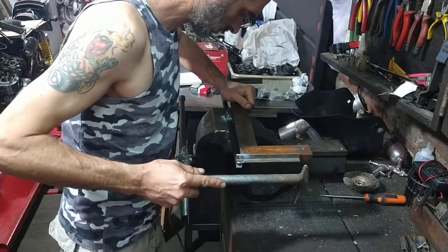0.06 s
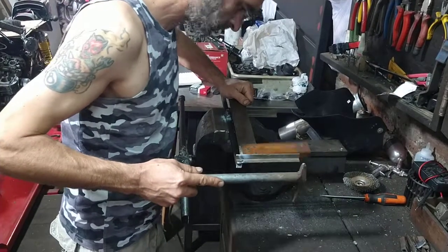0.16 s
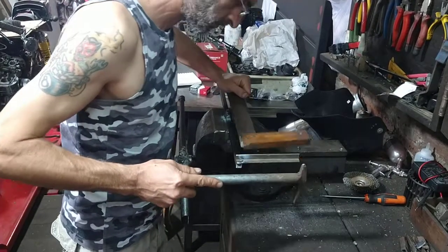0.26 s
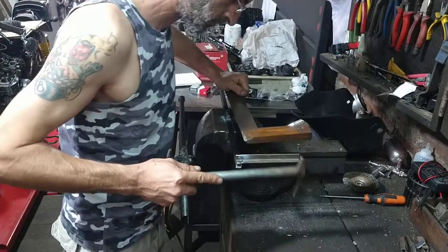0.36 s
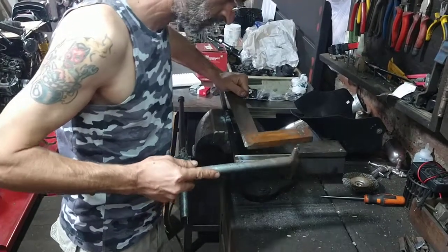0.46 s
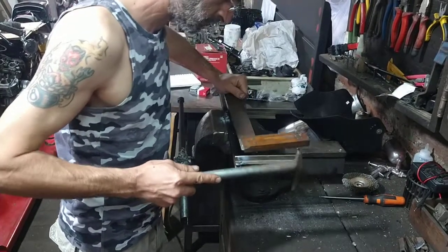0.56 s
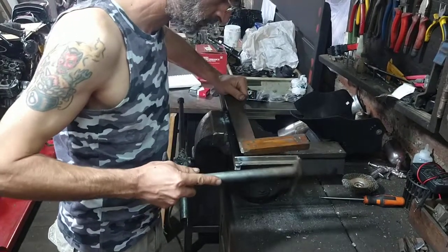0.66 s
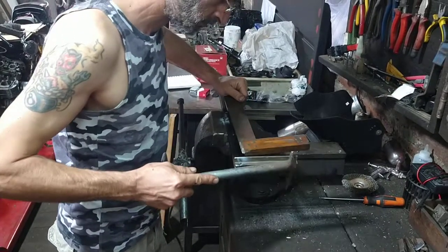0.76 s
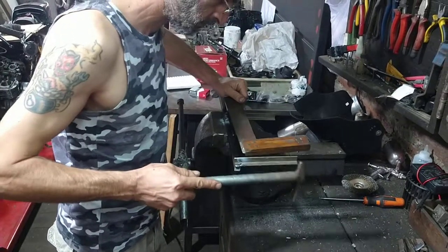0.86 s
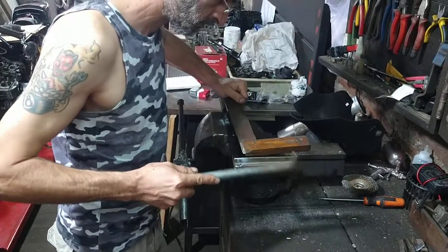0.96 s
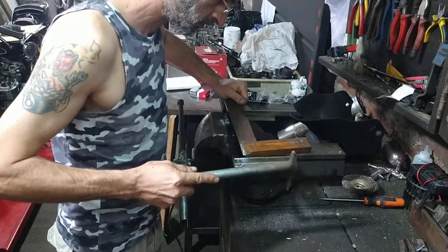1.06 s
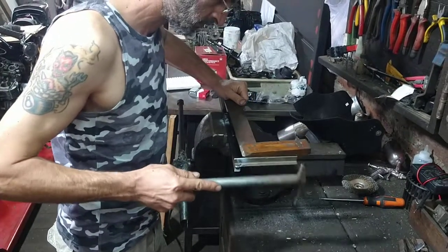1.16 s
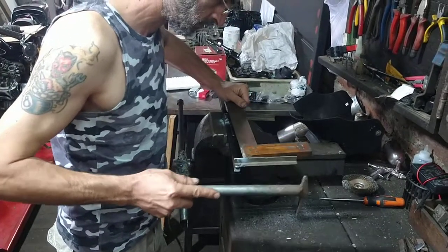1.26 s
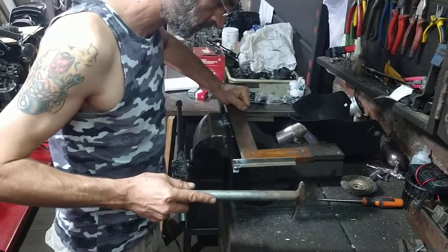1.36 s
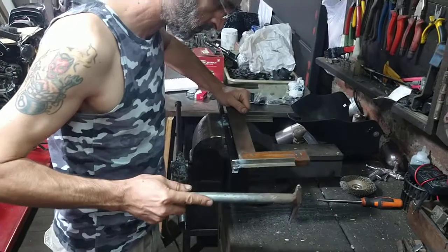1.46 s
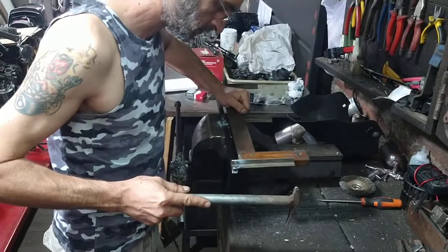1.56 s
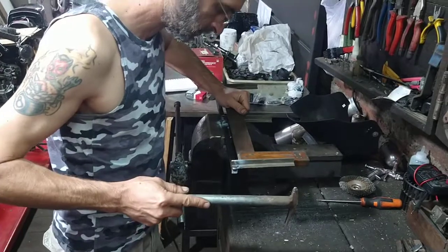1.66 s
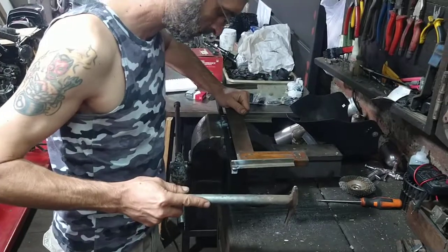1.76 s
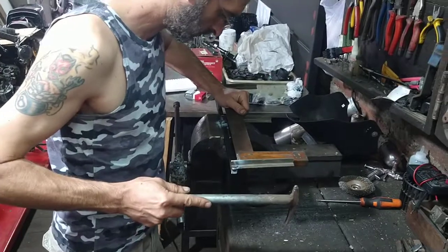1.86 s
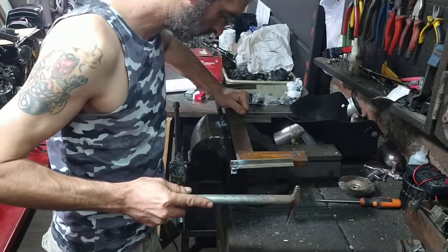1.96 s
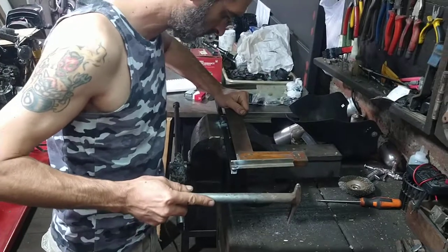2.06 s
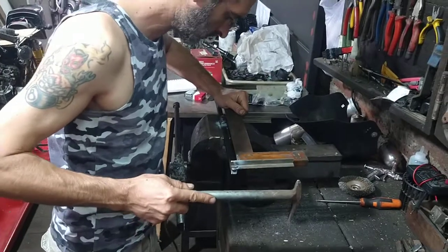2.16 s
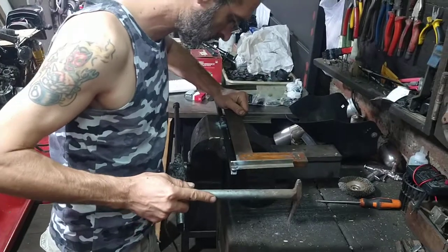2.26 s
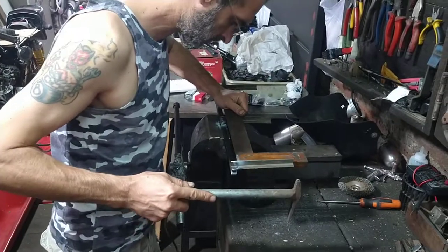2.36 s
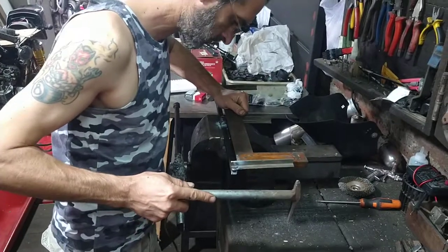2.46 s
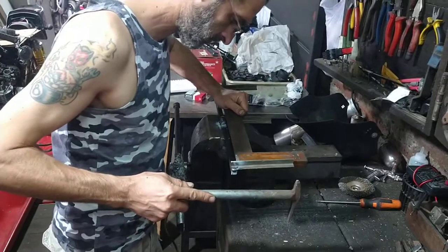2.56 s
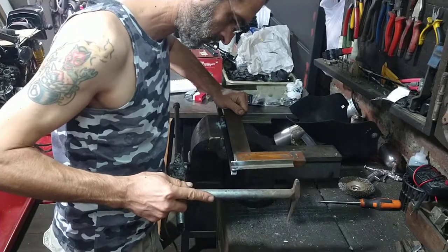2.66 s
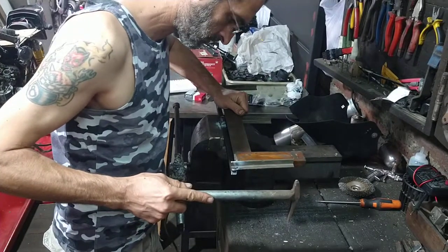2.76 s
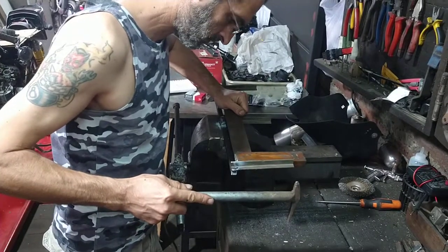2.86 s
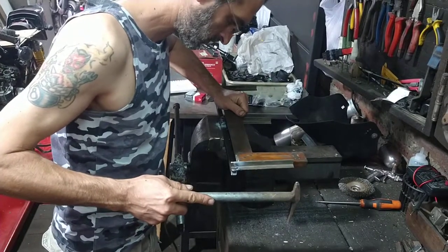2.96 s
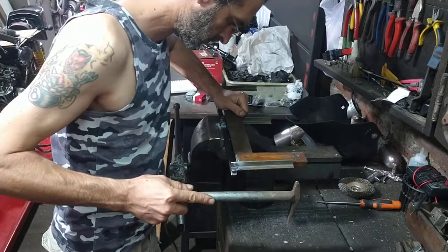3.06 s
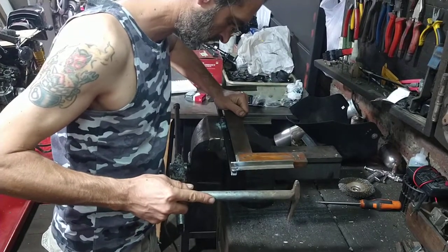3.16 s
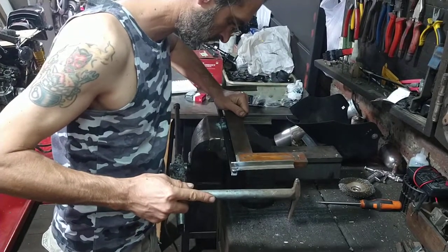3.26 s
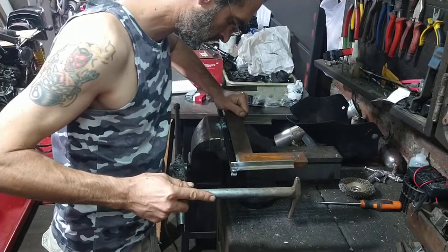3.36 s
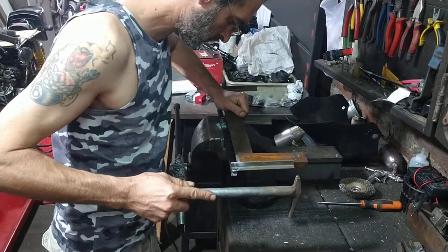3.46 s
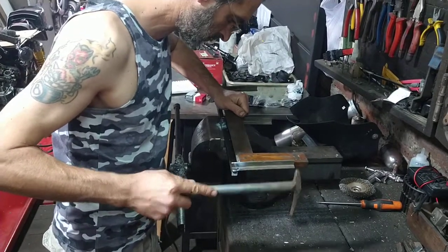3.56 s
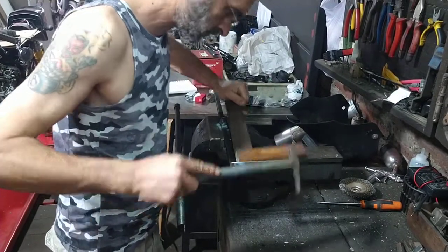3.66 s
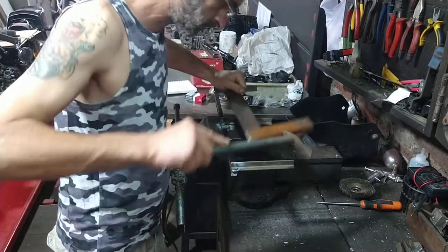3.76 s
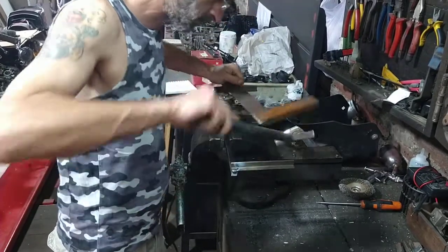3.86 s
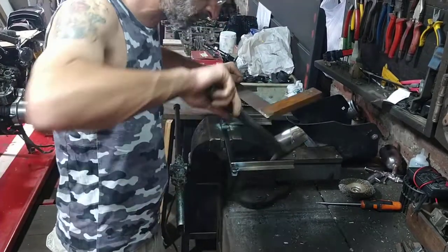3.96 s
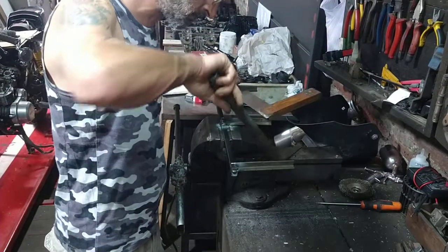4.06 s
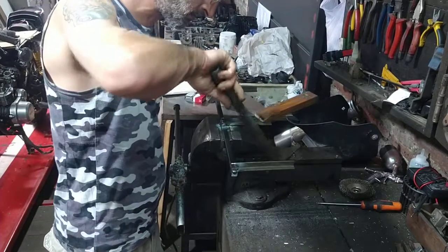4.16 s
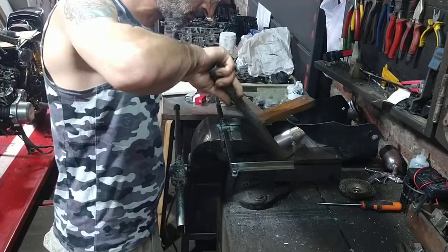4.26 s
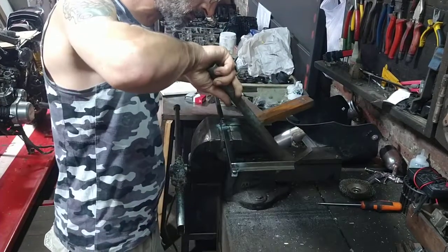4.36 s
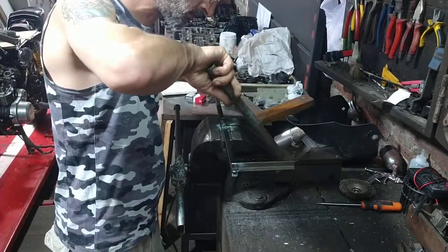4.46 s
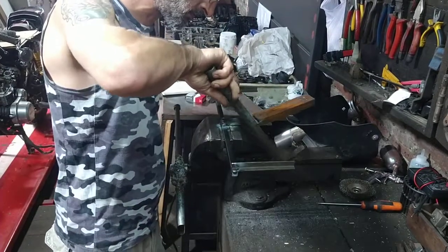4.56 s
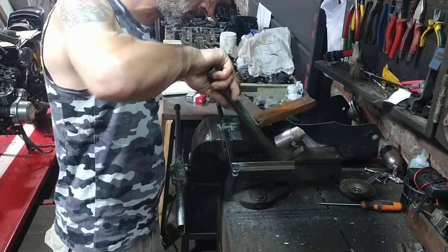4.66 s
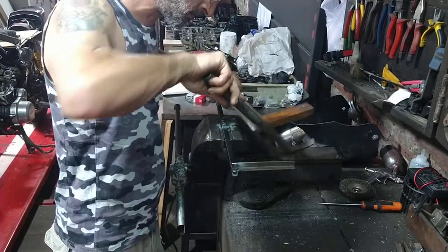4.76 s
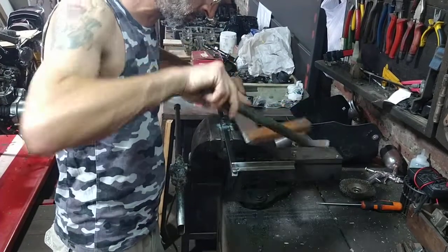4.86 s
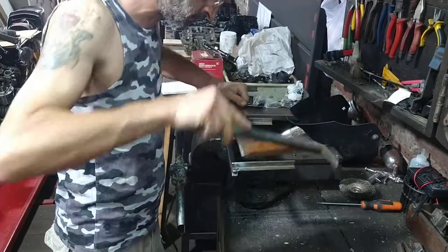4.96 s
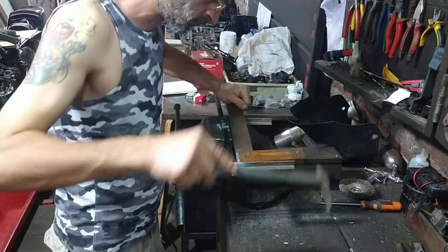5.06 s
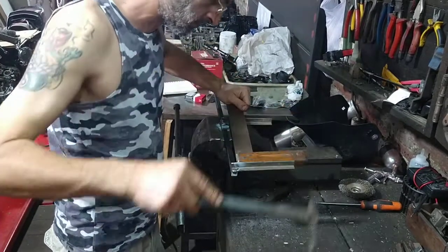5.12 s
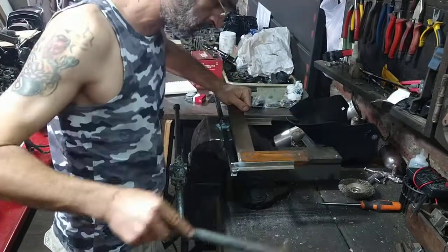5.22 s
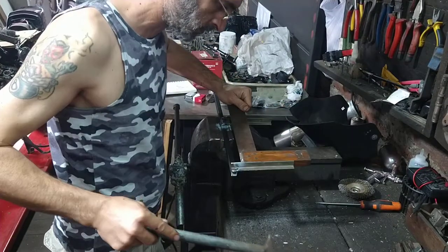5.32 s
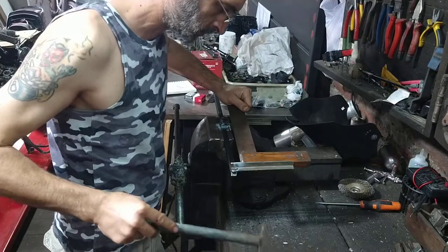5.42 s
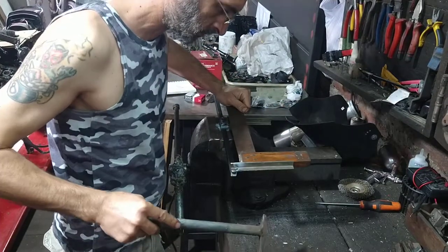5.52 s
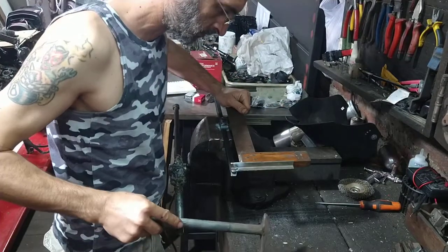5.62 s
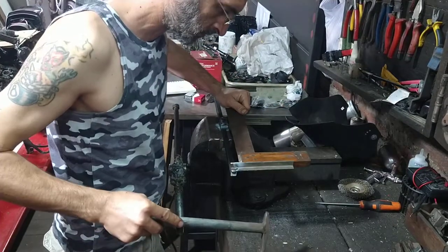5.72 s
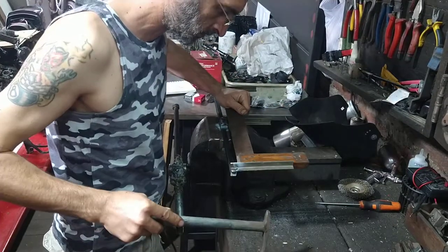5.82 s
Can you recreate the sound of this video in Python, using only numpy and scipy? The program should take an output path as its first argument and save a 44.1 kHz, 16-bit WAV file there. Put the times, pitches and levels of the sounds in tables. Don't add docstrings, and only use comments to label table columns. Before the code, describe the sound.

Close stereo microphones in a cluttered garage. Half a second of low workshop hum, then three loud hammer blows on angle iron in a vise at about 0.54, 0.81 and 1.09 s. Each is two to four contacts within some tens of milliseconds, a harsh bright clank with ringing between roughly 2 and 12 kHz, gone in a few tenths, over a low bench thump; the third is hardest. Faint bench thuds follow to 1.7 s. From 2.1 to 3.1 s it is quiet: slight cloth rustle and soft, evenly spaced rattling ticks. A light, duller tap comes at 3.73 s, a small rustle at 4.1 s, then two sharp clanks at 4.45 and 4.53 s, thinner and higher. More rustle and ticks near 4.85 and 5.15 s. At 5.38 s the iron is set down with a bouncing clunk, bench thuds and a brief noise swell, then quiet hum.

```python
import sys
import numpy as np
from scipy import signal
from scipy.fft import rfft, irfft
from scipy.io import wavfile
from scipy.ndimage import uniform_filter1d

SR = 44100
rng = np.random.default_rng(int(sys.argv[2]) if len(sys.argv) > 2 else 0)


def voltage_ratio(level):
    return 10 ** (np.asarray(level, float) / 20)


def digitize_waveform(pressure):
    field = np.atleast_2d(pressure).T
    bounded = np.clip(field, -1, 1)
    quanta = np.round(bounded * 32767).astype(np.int16)
    wavfile.write(sys.argv[1], SR, quanta)


N = 259749

# frequency in Hz, level in dB per Hz
VISE = [(290, -61), (500, -31), (1700, -12), (2070, -15.5), (2500, -9.5), (2850, -3), (3200, -15),
        (4030, -12), (5300, -3), (7640, -4.5), (9200, -6.5), (12400, -21.5), (13600, -16.5), (16500, -29.5)]
GLANCED = [(290, -60.5), (500, -29), (1700, -12), (2070, -17), (2500, -10), (2830, -4.5), (3200, -15),
           (4030, -13.5), (5300, -8.5), (7640, -10), (9200, -6.5), (12400, -21.5), (13600, -17.5),
           (16500, -26.5)]
SQUARE = [(290, -61), (500, -29), (1700, -13.5), (2070, -19), (2500, -9.5), (2830, -5), (3200, -19),
          (4030, -14), (5300, -4.5), (6100, -3), (7640, -8.5), (9200, -4), (12400, -18), (13600, -14.5),
          (16500, -28.5)]
LIFTED = [(290, -48), (500, -41), (1700, -12.5), (2160, -17), (3220, -12.5), (3580, -19.5), (5200, -7.5),
          (5700, -16.5), (6400, -5), (7340, -11.5), (8380, -10.5), (12000, -15), (13500, -27), (15200, -27),
          (16500, -34.5)]
KICKED = [(290, -52), (500, -30.5), (1700, -20), (2600, -17.5), (3220, -11.5), (3620, -22.5), (4900, -7.5),
          (5700, -14.5), (6200, -10), (6780, -6), (7500, -14.5), (8300, -11), (9000, -18.5), (11500, -16),
          (13500, -27), (16500, -35.5)]
GRAZE = [(240, -54.5), (400, -12.5), (994, -21.5), (1630, -5), (1900, -13.5), (2290, -1.5), (3160, -14),
         (4650, -8), (9610, -12), (13700, -24.5), (16000, -89)]
DROPPED = [(120, -62), (200, -18), (777, -13.5), (1420, -17), (1710, -15), (2130, -12.5), (3490, -11.5),
           (4520, -5), (5420, -6.5), (6300, -11), (7830, -5), (14600, -26), (16000, -58.5)]
# contacts (start in seconds, force in dB), steel modes (frequency in Hz, level in dB,
# time to fall 60 dB in seconds), share of ring left by the grip, clash in dB, clash colour,
# spread of each mode's cluster in Hz
FIRST = ([(0.5352, -15), (0.5414, -18), (0.5654, -21)], [(1755, -19, 0.3), (2298, -14, 0.3),
         (2530, -12.5, 0.17), (2715, -4.5, 0.34), (2820, -7.5, 0.44),
         (2960, -14.5, .36)] + [(5265, -11, 0.14), (5760, -5.5, 0.27), (6120, -10.0, 0.22),
         (6320, -14.5, 1.0), (6700, 0.0, 0.26), (6730, -7.5, 0.42), (7100, -4.5, 0.29), (7200, 0.0, 0.42),
         (7600, -5.5, 0.32), (8100, -4.5, 0.34), (8186, 1, 0.17), (8600, 9, 0.19), (9040, 7.0, 0.24),
         (9520, 2.5, 0.28), (10160, -5.5, 0.26), (11000, -12, 0.21), (11440, -5.0, 0.26), (12050, -7, 0.2),
         (13300, -15, 0.3)], 0.94, 6.4, VISE, 53)
SECOND = ([(.806, -18.5), (.813, -13), (.858, -24)], [(1852.5, -10.5, 0.45), (2420, -7.5, 0.4),
          (2770, -1.5, 0.5), (2870, -6, 0.55)] + [(3176, -14.5, 0.39), (5100, -18.5, 0.69),
          (5230, -5.0, 0.032), (5700, -11.5, 0.47), (5997, -8.5, 0.29), (6840, -15.0, 1.3),
          (7375, -20.5, 1.2), (7720, -28, 0.43), (9071, -11.5, 0.28), (9240, -7.5, 0.36), (9230, 5, 0.39),
          (10040, -13, 0.54), (10430, -27, 0.39), (11400, -25.5, 0.44), (11360, -15.5, 0.14),
          (11600, -18.5, 0.1833), (12820, -35.0, 0.8), (13200, -13.0, 0.21)], 0.99, 7.74, GLANCED, 33.7)
THIRD = ([(1.0869, -9.5), (1.0945, -14), (1.1084, -14), (1.1155, -18)], [(1796, -15, 0.16),
         (2330, -14, 0.22), (2796, -3, 0.67), (2870, -7.5, 0.7)] + [(3683, -24.5, 0.3), (5290, -3, 0.28),
         (5300, 1.5, 0.4), (5800, -1, 0.23), (5660, 2, 0.34), (5960, -1, .27), (5920, -6.5, 0.46),
         (6670, 0.5, 0.3), (7243, -20.5, 0.68), (7736, -10.5, 0.37), (7700, -13.5, 0.35),
         (8400, 6.5, 0.0807), (8860, 4, 0.26), (9300, 6.5, 0.3), (9980, -9.0, 0.25), (10400, -10.5, 0.074),
         (10790, -6.5, 0.3), (11540, -15.0, 0.54), (11500, -5.5, 0.17), (11800, -21.0, 0.2),
         (12820, -33.0, 0.22), (12940, -25.0, 0.21), (13300, -14.0, 0.19), (13770, -23.0, 0.2)],
         0.55, 6.9, SQUARE, 26)
TOUCH = ([(3.7305, -31.5), (3.7374, -34.5), (3.752, -39)], [(1390, 1.5, 0.15), (1656, -5.5, 0.3),
         (1910, -13, .3), (2290, -5, 0.22), (2300, -10, 0.27), (2620, -13.5, 0.58), (2820, -11, .1),
         (4264, -4.5, 0.35), (4660, -8, 0.3)], 1, 5.2, GRAZE, 32)
PRY = ([(4.4448, -13.5), (4.4524, -10.5), (4.4674, -14), (4.4804, -18)], [(1670, -10, 0.1),
       (2336, -14, 0.23), (2692, -13, 0.33), (4716, -9.5, .2), (5260, -10, 0.25), (6060, -1.5, 0.43),
       (6500, -11, 0.36), (7698, -15, 0.3), (8100, 3.5, 0.45), (8470, -3, 0.39), (9340, -14, .25),
       (10200, -4, 0.071), (11130, -2, .14), (11550, 0.5, 0.2)], 0.91, 0.95, LIFTED, 30)
REBOUND = ([(4.5284, -17), (4.5361, -13), (4.5574, -23)], [(2625, -4, 0.31), (3240, 7, 0.053),
           (4200, -11, 0.3), (4667, -8, 0.16), (5060, 0, 0.22), (5250, -17, 0.22), (6040, 2.5, 0.27),
           (6400, -10, 0.24), (6690, 3, .25), (6815, 2.5, 0.47), (6800, 14, .4), (7343, -4.5, 0.2),
           (8370, 3.5, 0.37), (10440, -14, 0.2), (11300, -2, 0.13), (11900, 0, 0.094)],
           0.68, 2.14, KICKED, 32)
SET_DOWN = ([(5.3785, -18), (5.393, -27.5), (5.411, -25), (5.432, -26)], [(1480, -18, 0.38),
            (1850, -21, .6), (2121, -9, 0.37), (2700, -6.5, 0.1), (3160, -13, 0.62), (4070, -6.5, 0.18),
            (4400, -6, 0.31), (4590, 2, 0.41), (5040, -17, 0.27), (5730, -7, 0.39), (5800, -2, 0.53),
            (7250, -2.5, 0.16), (7580, 0.5, 0.17), (8170, -6.5, 0.43), (9222, -13, 0.16)],
            1, 5.95, DROPPED, 19.4)


def evened(x):
    return x / np.sqrt(np.mean(x ** 2) + 1e-20)


def read(points, hz):
    f, value = np.transpose(points)
    return np.interp(np.log(hz + 1), np.log(f + 1), value)


def resonate(x, hz, width):
    return signal.lfilter(*signal.iirpeak(hz, hz / width, SR), x)


def causal(gain_db):
    log_gain = np.log(voltage_ratio(np.maximum(np.r_[gain_db, gain_db[-2:0:-1]], -100)))
    return np.fft.ifft(np.exp(np.conj(signal.hilbert(log_gain)))).real


def swell(rows, rise_s, fall_db_per_s, linger_db=-99, linger_db_per_s=99):
    t, gain = np.arange(0, N / SR + .01, .001), 0
    for start, hold, db, sag in rows:
        age = np.maximum(t - start, 0)
        late = np.maximum(t - start - hold, 0)
        rise = np.sin(np.pi / 2 * np.minimum(age / rise_s, 1)) ** 2
        release = voltage_ratio(-fall_db_per_s * late) + voltage_ratio(linger_db - linger_db_per_s * late)
        gain = gain + rise * voltage_ratio(db - sag * np.minimum(age, hold)) * release
    return np.interp(np.arange(N) / SR, t, gain)


def air():
    # frequency in Hz, level in dB per Hz
    air_colour = [(15, -57.5), (25, -21.5), (70, -14), (102, -7.5), (130, -14.5), (223, -9), (354, -21.5),
                  (405, -16.5), (545, -13), (695, -16), (1370, -16.5), (2410, -15.5), (3340, -25.5),
                  (8830, -24), (16000, -43.5)]
    # frequency in Hz, likeness of left and right from -1 to 1
    likeness = [(60, 1), (150, 0.87), (380, 0.93), (950, 0.029), (2380, -0.32), (5980, 0.0098),
                (15000, -0.01)]
    # frequency in Hz, left over right in dB
    air_lean = [(60, -3.5), (240, 2), (950, -1.5), (3770, -9), (15000, 2.5)]
    # frequency in Hz, width in Hz, level in dB
    hum_bands = [(103, 7.3, -68), (258.3, 11, -82.5), (284.9, 21, -72.5), (396.7, 15, -74),
                 (606.8, 11, -79.5), (683, 31, -80), (987, 22, -81), (1628, 18, -76.5), (4714, 39, -85.5)]
    air_db = -58.5
    frames, hz = N // 512 + 5, np.fft.rfftfreq(2048, 1 / SR)
    a, b, c, d, patches = rng.standard_normal((frames, 1025, 5)).T
    patches = evened(uniform_filter1d(uniform_filter1d(patches, size=20, axis=0), size=8, axis=1))
    same = np.clip(read(likeness, hz), -1, 1)[:, None]
    left = a + 1j * b
    right = same * left + np.sqrt(1 - same ** 2) * (c + 1j * d)
    z = np.array([left, right])
    raw = signal.istft(z, nperseg=2048, noverlap=1536)[1][:, :N]
    lean = read(air_lean, hz)[:, None] / 2
    z *= voltage_ratio(read(air_colour, hz)[:, None] + 1.6 * patches + np.array([lean, -lean]))
    wash = voltage_ratio(air_db - 2.5) * evened(signal.istft(z, nperseg=2048, noverlap=1536)[1][:, :N])
    return wash + sum(voltage_ratio(db) * evened(resonate(raw, f, width)) for f, width, db in hum_bands)


def opened_air():
    # start in seconds, hold in seconds, extra air in dB, sag in dB per second
    openings = [
        (.55, 0.2, -1.5, -11.5),
        (.81, 0.19, 3, -5.5),
        (1.09, 0.28, 1, -8),
        (3.735, 0.1, -2, 0.5),
        (4.45, 0.2, 3.5, -6),
        (5.38, 0.22, 17, 48),
    ]
    rest_db = 1.5
    opened = voltage_ratio(rest_db) + swell(openings, rise_s=.024, fall_db_per_s=350, linger_db=-13, linger_db_per_s=24.5)
    steady = air()
    low = signal.oaconvolve(steady, signal.firwin(101, 3300, fs=SR)[None], "same")
    return low * opened + (steady - low) * opened ** 0.56


def rustle():
    # start in seconds, hold in seconds, level in dB, sag in dB per second
    moves = [(2.1, .15, -69, 98.5), (2.515, 0.032, -76, 201.5), (2.572, .25, -72, 41.5),
             (2.915, .25, -76, 10), (4.09, .18, -69.5, 56), (4.84, 0.11, -70, 58.5), (5.17, 0.11, -71, 58)]
    grains = voltage_ratio(3.1 * rng.exponential(1, (2, N))) * (rng.random((2, N)) < 5000 / SR)
    bright = resonate(grains * rng.choice([-1, 1], (2, N)), 9500, 3500)
    cloth = evened(resonate(bright, 9500, 3500))
    return swell(moves, rise_s=0.012, fall_db_per_s=200.5) * cloth


def rattle():
    # start in seconds, number of ticks, level in dB
    rattles = [(2.105, 2, -62.5), (2.516, 3.5, -57), (2.692, 2.8, -61.5), (2.926, 5, -58.5), (4.09, 3, -63),
               (4.85, 2, -61.5), (5.14, 2.1, -61.5)]
    # frequency in Hz, width in Hz, level in dB
    part_modes = [(4900, 370, 6), (7700, 500, 3), (8650, 800, 2), (11700, 500, -2), (13000, 600, -14),
                  (15400, 500, -12)]
    gap_s = .0585
    t, puffs = np.arange(3000) / SR, np.zeros((2, N + 3000))
    for start, count, db in rattles:
        for k in range(int(count)):
            at = round((start + k * gap_s) * SR)
            fade = voltage_ratio(db + 1.7 * rng.standard_normal() - 60 * t / 0.2)
            puffs[:, at:at + len(t)] += fade * rng.standard_normal((2, len(t)))
    return sum(voltage_ratio(db) * resonate(puffs[:, :N], hz, width) for hz, width, db in part_modes)


def bench():
    # frequency in Hz, width in Hz
    bench_modes = [
        (96, 20),
        (185, 33),
        (400, 150),
    ]
    # start in seconds, hold in seconds, level in dB, sag in dB per second
    deep_jolts = [(.55, 0.093, -43, 8), (.70, 0.042, -43.5, 0), (.82, 0.24, -40.5, 63),
                  (1.10, 0.059, -40.5, 1), (1.16, 0.25, -42.5, 31.5), (1.53, 0.046, -51, 0.5),
                  (1.68, 0.11, -60, 21), (3.07, 0.059, -58.5, -2), (3.78, 0.047, -60, 0),
                  (4.475, 0.18, -45.5, 19), (5.44, 0.04, -40.5, 0), (5.55, 0.037, -46.5, 0),
                  (5.74, 0.077, -52.5, -1)]
    upper_jolts = [(0.217, 0.062, -63, 50), (0.533, 0.16, -45.5, 39), (0.795, 0.23, -43.5, 62),
                   (1.082, 0.25, -38, 70), (1.53, 0.027, -50, 49.5), (3.067, 0.029, -58.5, 17.5),
                   (3.732, 0.15, -45.5, 98), (4.45, 0.16, -58, 1), (5.395, 0.21, -45.5, 31)]
    board_jolts = [(1.092, 0.27, -67, 22), (4.45, 0.18, -71, 10), (5.38, .12, -48, 15),
                   (5.52, 0.085, -67, 24), (5.745, 0.063, -66, 10.5)]
    jolts = (deep_jolts, upper_jolts, board_jolts)
    rise_s, fall_db_per_s = (0.033, 0.014, .03), (399, 400, 300)
    out = np.zeros((2, N))
    for k, (hz, width) in enumerate(bench_modes):
        both, apart = rng.standard_normal((2, N))
        push = both + 0.098 * np.outer([1, -1], apart)
        shake = resonate(resonate(push, hz, width), hz, width)
        power = (shake ** 2).mean(0)
        swing = np.sqrt(uniform_filter1d(power, size=900) + 0.072 * np.mean(shake ** 2))
        out += swell(jolts[k], rise_s[k], fall_db_per_s[k]) * evened(shake / swing)
    return out


def garage():
    # frequency in Hz, time to fall 60 dB in seconds
    decay = [(500, 0.37), (1500, 0.55), (3000, 0.49), (6000, 0.44), (10000, 0.32), (15100, 0.34)]
    # delay of a nearby wall in seconds, level in dB
    walls = [(.004, 7), (.008, -7.5), (0.013, -17.5), (0.017, -14), (.024, -3)]
    taps = np.zeros((2, SR))
    at = np.arange(100, SR - 10, 10) + rng.integers(0, 10, (2, (SR - 101) // 10))
    np.put_along_axis(taps, at, rng.choice([-1., 1.], at.shape), 1)
    taps[1] = 0.34 * taps[0] + 1.375 * taps[1]
    hz, t, z = signal.stft(taps, SR, nperseg=128)
    tail = signal.istft(z * voltage_ratio(-60 * t / read(decay, hz)[:, None]), SR, nperseg=128)[1][:, :SR]
    room = voltage_ratio(6.5) * tail / np.linalg.norm(tail[0])
    room[[0, 1], [0, 1]] += 1.5
    for delay, db in walls:
        room[[0, 1], round(delay * SR) + rng.integers(0, 30, 2)] += voltage_ratio(db) * rng.choice([-1, 1], 2)
    return voltage_ratio(-8.0) * room[:, :SR // 2]


def suppress(x, depth_db=12, knee_db=5):
    # frequency in Hz, threshold in dB
    shut_below = [(500, -74.5), (2000, -74), (5000, -56.5), (10000, -64.5), (15000, -77)]
    hz, t, z = signal.stft(x, SR, nperseg=256)
    power = uniform_filter1d(uniform_filter1d((abs(z) ** 2).mean(0), size=9, axis=0), size=5, axis=1)
    under = (read(shut_below, hz)[:, None] - 10 * np.log10(abs(power) + 1e-14)) / knee_db
    return signal.istft(z * voltage_ratio(-depth_db * (1 + np.tanh(under)) / 2), SR, nperseg=256)[1][:, :N]


def knock(contacts, modes, hold, clash_db, colour, spread):
    t = np.arange(SR // 3) / SR
    hz, db, t60 = np.repeat(modes, 3, axis=0).T[:, :, None]
    flank = np.tile([0, -1, 1], len(modes))[:, None]
    hz = hz + spread * flank * rng.uniform(0.36, 1, hz.shape)
    db = db + 2.0 - 3.8 * abs(flank)
    phase = 2 * np.pi * rng.random(hz.shape) + 1.2 * rng.standard_normal((2, *hz.shape))
    wave = np.sin((2 * np.pi * (hz * t % 1) + phase).astype(np.float32))
    ring = (voltage_ratio(db - 60 * t / np.clip(hold * t60, .03, .65)) * wave).sum(1)
    ring *= np.minimum(1, (t[-1] - t) / .05)
    vise = causal(read(colour, np.fft.rfftfreq(2048, 1 / SR)))
    rings, clashes = np.zeros((2, N)), np.zeros(N)
    for start, force_db in contacts:
        burst = rfft(rng.standard_normal(2048) * voltage_ratio(-60 * t[:2048] / 0.011))
        even = irfft(burst / abs(burst)) * voltage_ratio(-60 * t[:2048] / .03)
        clash = signal.fftconvolve(even, vise)
        at = round(start * SR) - 30
        clashes[at:at + len(clash)] += voltage_ratio(force_db + clash_db) * clash / abs(clash).max()
    first_s, first_db = contacts[0]
    at = round(first_s * SR) - 30
    rings[:, at:at + len(t)] = voltage_ratio(first_db - 17.5) * ring * (1 - np.exp(-t / 0.0017))
    return np.vstack([rings, clashes])


def steel():
    knocks = [
        FIRST,
        SECOND,
        THIRD,
        TOUCH,
        PRY,
        REBOUND,
        SET_DOWN,
    ]
    # frequency in Hz, left over right in dB
    steel_lean = [(60, 5), (110, 0.5), (200, 2), (380, -1), (700, -1), (1290, -1), (2380, -4.5), (4400, -5),
                  (8120, -0.5), (11000, 2.5), (15000, -1)]
    left, right, clash = sum(knock(*k) for k in knocks)
    lean = read(steel_lean, np.fft.rfftfreq(512, 1 / SR)) / 2
    wet = signal.fftconvolve((clash + voltage_ratio(-10.5) * left)[None], garage(), axes=1)[:, :N]
    return signal.fftconvolve(wet + [left, right], [causal(lean), causal(-lean)], axes=1)[:, :N]


def scene():
    return suppress(steel()) + bench() + opened_air() + rustle() + rattle()


def band_top(t):
    # start in seconds, length in seconds, top of the band in Hz
    narrowed = [(.535, .155, 14900), (.806, .12, 15150), (.925, .075, 14150), (1.087, .18, 14100),
                (4.443, .083, 12650), (4.526, .1, 11880), (4.626, .034, 13400), (5.41, .15, 15300)]
    rest_hz, full_hz = 15850, 16900
    lead_s, burst_s, refill_s = .008, .011, .05
    edge, until = np.full(len(t), rest_hz), 0
    for start, length, hz in narrowed:
        edge[(t > start) & (t < start + length)] = hz
        if start - until > refill_s:
            edge[(t > start - lead_s) & (t < start + burst_s)] = full_hz
        until = start + length
    return edge


def top_cut(x):
    return signal.sosfilt(signal.butter(12, 16620, fs=SR, output="sos"), x)


def record(dry):
    dry = signal.sosfilt(signal.butter(2, 45, "high", fs=SR, output="sos"), dry)
    hz, t, z = signal.stft(dry, SR, nperseg=256)
    edge, hz = band_top(t), hz[:, None]
    power = uniform_filter1d(uniform_filter1d((abs(z) ** 2).mean(0), size=2, axis=0), size=10, axis=1)
    weak = power < power[12:].max(0) * voltage_ratio(-70)
    lost = weak & (hz > 9500) & (edge < 15400)
    mix = signal.istft(z * ((hz < edge) & ~lost), SR, nperseg=256)[1][:, :N]
    return top_cut(mix)


dry = scene()
out = record(dry)
digitize_waveform(out)
```